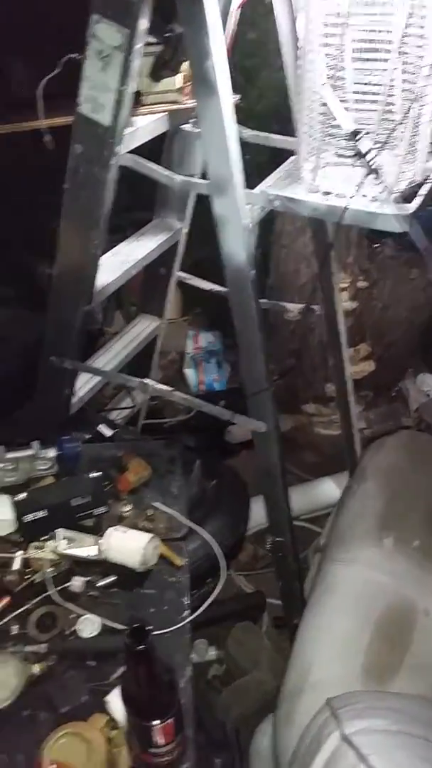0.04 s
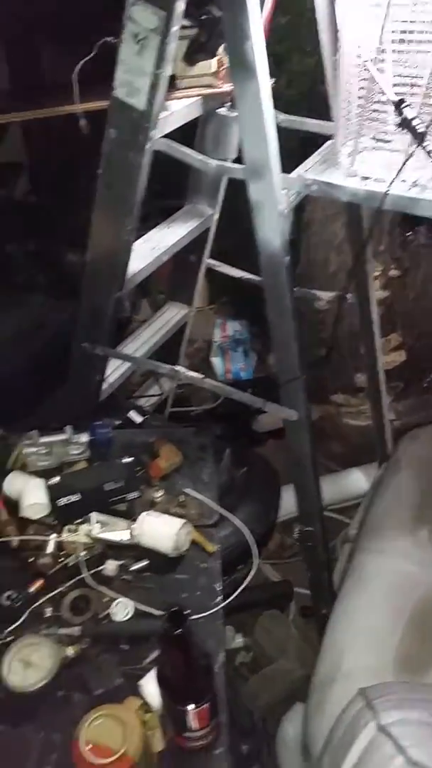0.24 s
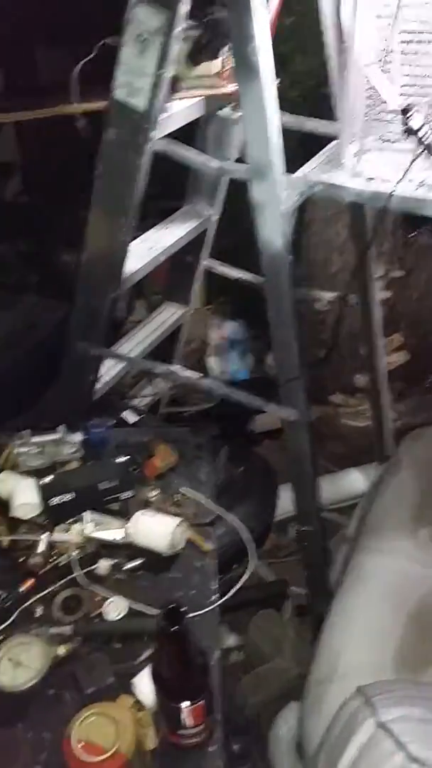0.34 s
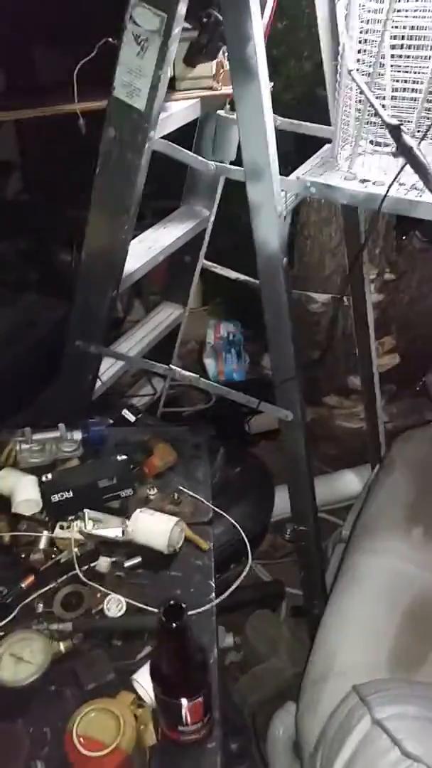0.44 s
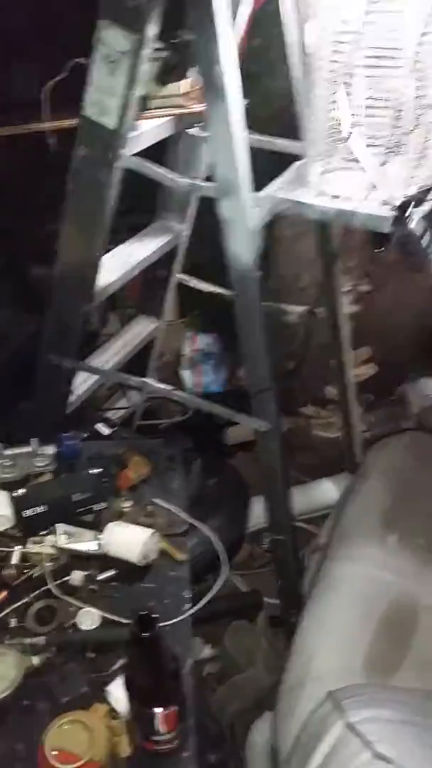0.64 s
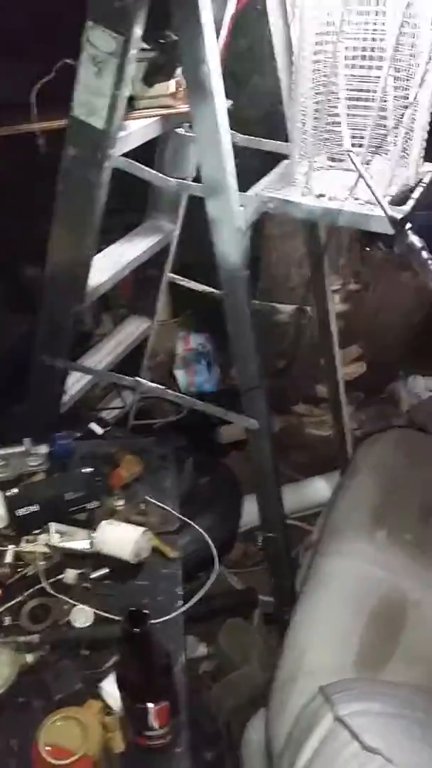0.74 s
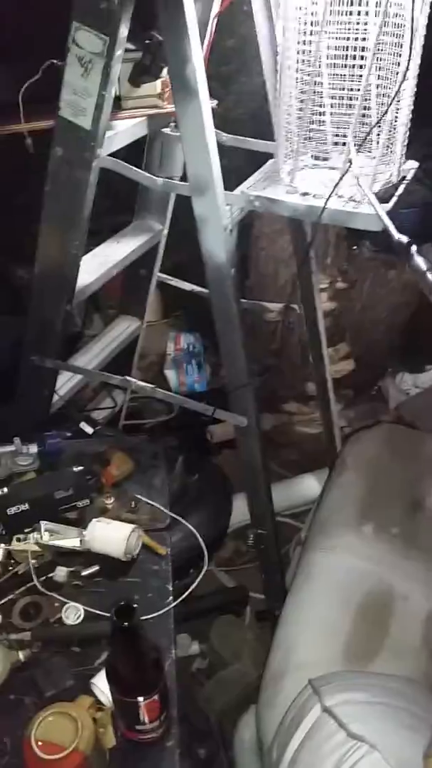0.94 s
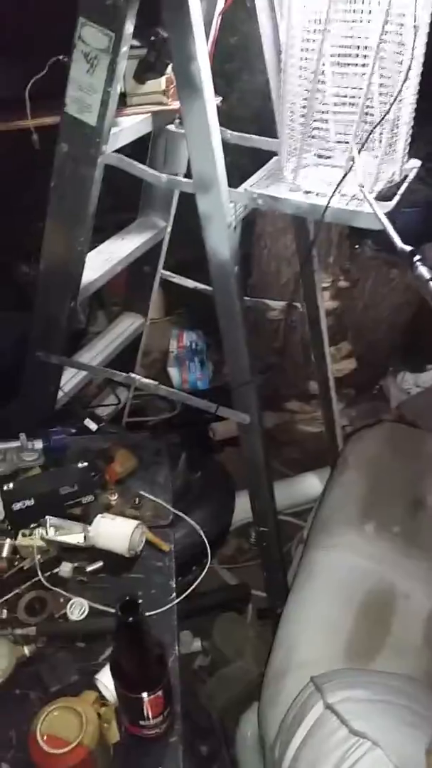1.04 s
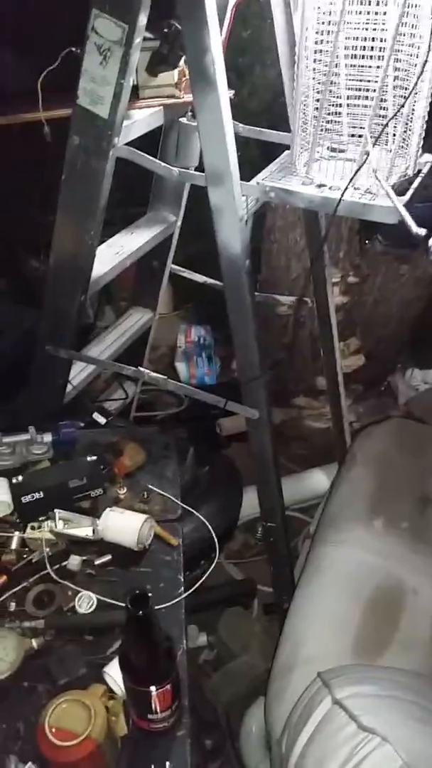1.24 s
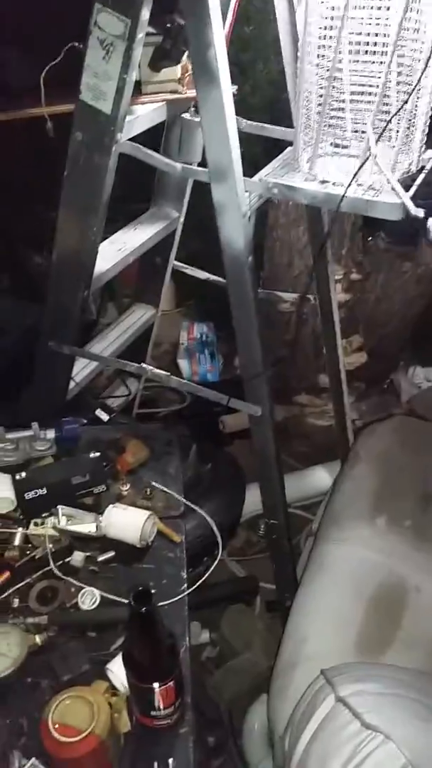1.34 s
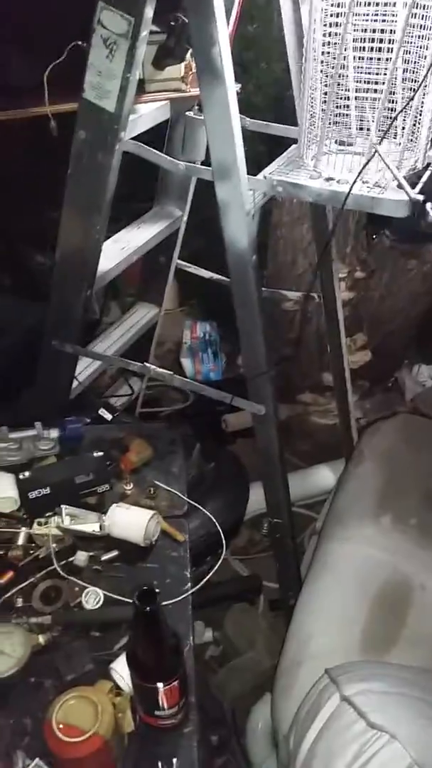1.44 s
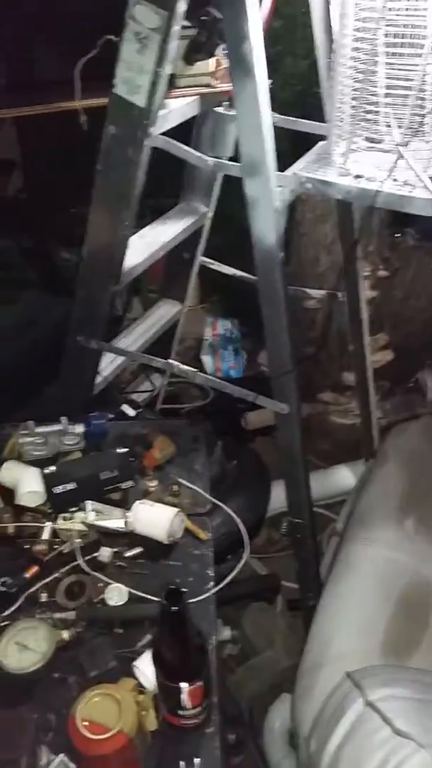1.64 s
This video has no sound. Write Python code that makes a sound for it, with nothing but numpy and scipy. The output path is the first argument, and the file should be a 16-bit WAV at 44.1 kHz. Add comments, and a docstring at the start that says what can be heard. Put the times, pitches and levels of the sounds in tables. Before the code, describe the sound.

Electric arcs jump from a wire grid in a rapid crackling burst, followed by one weaker snap. A machine faintly hums, whines and hisses throughout, and the small workshop adds a brief echo.

```python
"""High-voltage arcs jump from a wire grid in a small cluttered workshop: a crackling burst, then a snap.
Each arc is a sharp pressure spike, a sputter of tiny discharges and a thump of heated air,
scattered by clutter and walls and prolonged by the room's modes and reverberation.
Behind them a machine hums, whines and hisses faintly throughout.
The two microphone ports colour the treble differently."""
import sys
import numpy as np
from scipy import signal
from scipy.fft import rfft, irfft, next_fast_len
from scipy.io import wavfile
from scipy.ndimage import uniform_filter1d

SR = 44100
rng = np.random.default_rng(int(sys.argv[2]) if len(sys.argv) > 2 else 0)


def store_pcm(level_fs):
    """Save levels as 16-bit WAV."""
    pcm = np.round(np.clip(level_fs, -1, 1) * 32767).astype(np.int16)
    wavfile.write(sys.argv[1], SR, np.atleast_2d(pcm).T)


N = 74970


def undb(db):
    """Amplitude ratio of a level in decibels."""
    return 10 ** (np.asarray(db) / 20)


def level(x, db):
    """Normalisation to an rms level."""
    return x * undb(db) / np.sqrt(np.mean(x ** 2))


def unit(x):
    """Normalisation to a mean energy of one per channel."""
    return x / np.sqrt(np.mean(np.sum(x ** 2, axis=-1)) + 1e-18)


def colour(x, points):
    """Minimum-phase filter through (frequency [Hz], gain [dB]) points, by folding the cepstrum."""
    size = 2 * next_fast_len(x.shape[-1])
    hz, db = np.array(points, float).T
    bin_hz = np.maximum(np.fft.rfftfreq(size, 1 / SR), 1)
    gain = undb(np.interp(np.log(bin_hz), np.log(hz), db))
    cepstrum = irfft(np.log(gain))
    cepstrum[1:size // 2] *= 2
    cepstrum[size // 2 + 1:] = 0
    return irfft(rfft(x, size) * np.exp(rfft(cepstrum)))[..., :x.shape[-1]]


def rolloff(x, kind, hz):
    """Second-order low-pass or high-pass: 12 dB per octave beyond the cutoff."""
    return signal.sosfilt(signal.butter(2, hz, kind, fs=SR, output="sos"), x)


def diffuse(size=N, corner_hz=800):
    """Diffuse white noise at two ports: coherent at long wavelengths, incoherent at short ones."""
    coherence = 0.98 / (1 + (np.fft.rfftfreq(size, 1 / SR) / corner_hz) ** 2)
    mid, side = rfft(rng.standard_normal((2, size)))
    mid, side = mid * np.sqrt((1 + coherence) / 2), side * np.sqrt((1 - coherence) / 2)
    return irfft(np.array([mid + side, mid - side]), size)


def wander(rate_hz):
    """Slow random modulation of unit rms: random steps, smoothed twice."""
    hold = int(SR / rate_hz)
    steps = np.repeat(rng.standard_normal(N // hold + 1), hold)
    return level(uniform_filter1d(uniform_filter1d(steps, hold), hold)[:N], 0)


def tones(partials, t, waver_db, drift_rad):
    """Sinusoids under random amplitude and phase modulation."""
    return sum(np.sqrt(2) * undb(db + waver_db * wander(25))
               * np.sin(2 * np.pi * hz * t + drift_rad * wander(6)) for hz, db in partials)


def machine(t, hiss_hz=4370, hiss_width_hz=700):
    """Line spectra (hum, whine) over continuous ones (rumble, air, hiss), heard at a varying level."""
    # slow swell and dip in the level of the background hum, whine and hiss: (time [s], gain [dB])
    background_gain = [(0, 7), (0.06, 5), (0.13, 9), (0.2, 8.5), (0.45, 6), (0.6, 3), (0.8, 2.5),
                       (1.0, -0.5), (1.33, 0.5), (1.45, 5), (1.56, 7.5), (1.67, 11.5), (1.7, 10)]
    # spectra of the rumble and the rushing air: (frequency [Hz], relative level [dB])
    rumble_spectrum = [(20, -15.5), (35, 0.5), (55, -5.5), (85, -1), (120, 2.5), (155, -4.5), (225, -3.5),
                       (290, -12.5), (450, -18), (900, -62.5)]
    air_spectrum = [(150, -1.5), (400, 1.5), (600, 0.5), (1100, -6), (1550, -4.5), (2000, -11), (3000, -22),
                    (5500, -40.5), (7500, -29), (9500, -41), (16000, -35)]
    # partials of the hum and the whine: (frequency [Hz], level before modulation [dB])
    hum_partials = [(58.5, -74.5), (117, -72.5)]
    whine_partials = [(1474.7, -77.5), (1734, -87.5)]
    gain_db = np.interp(t, *np.array(background_gain).T)
    rumble = level(colour(diffuse(), rumble_spectrum), -59.5)
    hum = tones(hum_partials, t, waver_db=5.0, drift_rad=0.65)
    air = level(colour(diffuse(), air_spectrum), -70)
    hiss = signal.lfilter(*signal.iirpeak(hiss_hz, Q=hiss_hz / hiss_width_hz, fs=SR), diffuse())
    hiss = signal.lfilter(*signal.iirpeak(hiss_hz, Q=2, fs=SR), hiss)
    hiss = level(hiss, -80.5) * undb([[0], [-4.5]])  # weaker on the right
    whine = np.array([tones(whine_partials, t, waver_db=2, drift_rad=0.54) for _ in range(2)])
    return ((rumble + hum) * undb(0.83 * gain_db) + air * undb(1.01 * gain_db)
            + hiss * undb(0.98 * gain_db) + whine * undb(gain_db))


def whiten(x, band_hz=350.7):
    """Spectral whitening: division by the smoothed spectrum evens out a click's chance peaks and dips."""
    spectrum = rfft(x)
    power = uniform_filter1d(np.abs(spectrum) ** 2, max(int(band_hz * len(x) / SR), 1))
    return unit(irfft(spectrum / np.sqrt(np.abs(power) + 1e-12), len(x)))


def arc(t, spike_db, sputter_db, sputter_ms, thump_db):
    """Electrical breakdown at t = 0: tiny discharges crowd round a pressure spike; heated air thumps."""
    # spectrum of the sputter: (frequency [Hz], gain [dB])
    sputter_spectrum = [(100, -19), (500, -10.5), (1100, -10), (2500, -6), (4500, -3.5), (7000, 1),
                        (11000, 2.5), (16000, -0.5)]
    sparks_per_s, spread_db = 13000, 2
    spike_decay_s, thump_decay_s, thump_hz = 0.00005, 0.0027, 176
    age, started = np.maximum(t, 0), t >= 0
    pressure, weakness = rng.standard_normal((2, len(t)))
    fires = rng.random(len(t)) < sparks_per_s / SR
    sparks = fires * pressure * undb(-spread_db * weakness)
    envelope = np.exp(-(t * 1000 / sputter_ms) ** 2)
    sputter = undb(sputter_db - 6.5) * colour(whiten(sparks * envelope), sputter_spectrum)
    spike = undb(spike_db - 12) * unit(started * np.exp(-age / spike_decay_s))
    oscillation = started * np.exp(-age / thump_decay_s) * np.cos(2 * np.pi * thump_hz * age)
    thump = undb(thump_db - 15.5) * unit(oscillation)
    return rolloff(sputter - spike - thump, "highpass", hz=61)


def workshop():
    """Room impulse response: direct sound, scattering, wall echoes, normal modes and a duller late tail."""
    # normal modes of the room: (frequency [Hz], reverberation time [s], level [dB])
    modes = [(234.2, 0.12, -19.5), (356, 0.15, -23.5), (444.2, 0.32, -22), (493.6, 0.24, -22),
             (841, 0.14, -20.5)]
    # wall echoes: (delay [s], level [dB])
    echoes = [(0.0155, -7), (0.039, -11)]
    port_lag_s, scatter_s, build_s, crossover_hz = 0.00018, 0.0027, 0.004, 510
    t = np.arange(24000) / SR

    def decay(t60_s, db):
        """Reverberant envelope: a quick build-up, then 60 dB of exponential decay in t60_s."""
        return undb(db) * unit(np.exp(-np.log(1000) * t / t60_s) * (1 - np.exp(-t / build_s)))

    def scatter(delay_s, db):
        """Envelope of a reflection spread in time by scattering."""
        return undb(db) * unit((t >= delay_s) * np.exp(-np.abs(t - delay_s) / scatter_s))

    direct = np.zeros((2, len(t)))
    direct[0, 0] = direct[1, int(port_lag_s * SR)] = 1
    clutter_power = scatter(delay_s=0, db=-2.5) ** 2
    echo_power = sum(scatter(*echo) ** 2 for echo in echoes)
    treble_envelope = np.sqrt(decay(t60_s=0.22, db=-2) ** 2 + clutter_power + echo_power)
    field = diffuse(len(t))
    treble = rolloff(field * treble_envelope, "highpass", crossover_hz)
    bass = rolloff(field * decay(t60_s=0.24, db=0), "lowpass", crossover_hz)
    ringing = sum(np.sqrt(2) * decay(t60_s, db) * np.sin(2 * np.pi * (hz * t + rng.random()))
                  for hz, t60_s, db in modes)
    tail = rolloff(diffuse(len(t)) * decay(t60_s=0.65, db=-15.5), "lowpass", hz=8000)
    return direct + ringing + treble - bass + tail  # bass inverted so the crossover does not cancel


def arcing(lead_s=0.015):
    """Convolution with the room: every arc jumps at another spot, so each has its own reflections."""
    # arcs on the grid, each level relative to that part's base level:
    # (time [s], spike level [dB], sputter level [dB], sputter half-width [ms], thump level [dB])
    arcs = [(0.2102, 0.5, -14.5, 1.5, 5), (0.2247, -8.5, -15.5, 4, -3.5), (0.2390, -2.5, -8, 0.81, -3.5),
            (0.2570, -0.5, -4, 1.8, 4), (0.271, -18.5, -11, 2, -2), (0.2806, -6.5, -4.5, 0.9, -1.5),
            (0.288, -9, -11, 1.2, -4), (0.2981, -18.5, 3, 1.2, -1), (0.3027, -17, 4, 2.8, -7.5),
            (0.3115, -2.5, -8, 1.5, 2.5), (0.3225, -0.5, -1, 0.65, -12.5), (0.3340, -5, 4.5, 1.8, -9),
            (0.3664, 2.5, 5, 1.7, -4.5), (0.382, -12, -5, 2.5, -6.5), (0.4082, -7, -11, 0.67, -16),
            (0.6690, -29, -7.5, 0.5, -14), (0.6716, -14, -16, 2.5, -5.5)]
    t = np.arange(2400) / SR - lead_s  # the sputter begins ahead of the spike
    out = np.zeros((2, N))
    for time_s, *shape in arcs:
        room = workshop()
        start = int((time_s - lead_s) * SR)
        heard = signal.fftconvolve(arc(t, *shape)[None], room, axes=1)[:, :N - start]
        out[:, start:start + heard.shape[1]] += heard
    return out


def scene():
    """Superposition of the running machine and the arcs in the room."""
    return machine(np.arange(N) / SR) + arcing()


def record(dry):
    """Microphone transfer function: port colouring, faint self-noise, bass roll-off, a steep top cut."""
    # frequency response of the ports: (frequency [Hz], left gain [dB], right gain [dB])
    ports = [(202, 0.5, 0), (456, -0.5, -3.5), (750, 0, -4.5), (1082, 1, -1), (1700, -1.5, -4),
             (2600, -1, -8.5), (3600, 0, -6), (4600, 4, -11.5), (6000, 2, -17.5), (7500, 3, -14.5),
             (8800, -4.5, -9.5), (10200, -6.5, 4.5), (12500, -3, -3), (16000, -0.5, 1.5)]
    noise_db, top_hz = -90.5, 16100
    left = colour(dry[0], [(hz, db) for hz, db, _ in ports])
    right = colour(dry[1], [(hz, db) for hz, _, db in ports])
    self_noise = undb(noise_db) * rng.standard_normal((2, N))
    picked_up = rolloff(np.array([left, right]) + self_noise, "highpass", hz=30)
    return signal.sosfilt(signal.ellip(10, .1, 80, top_hz, fs=SR, output="sos"), picked_up)


dry = scene()
out = record(dry)
store_pcm(out)
```